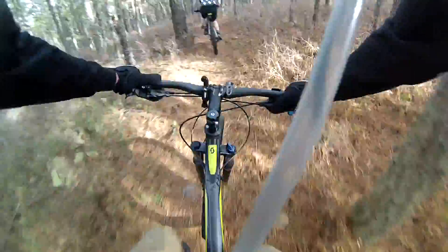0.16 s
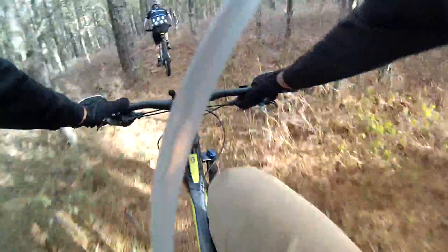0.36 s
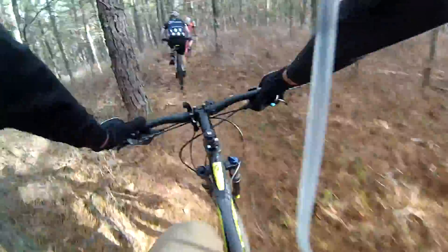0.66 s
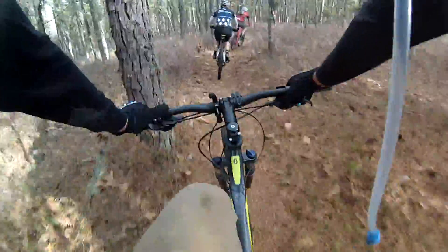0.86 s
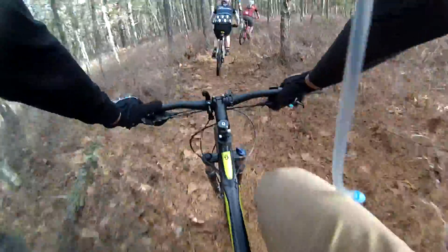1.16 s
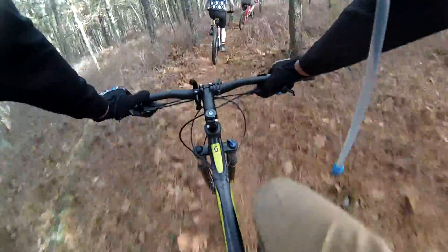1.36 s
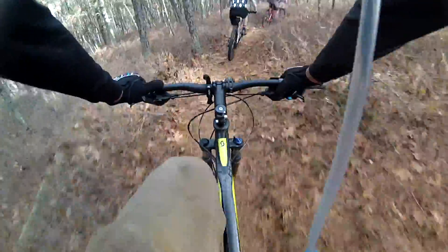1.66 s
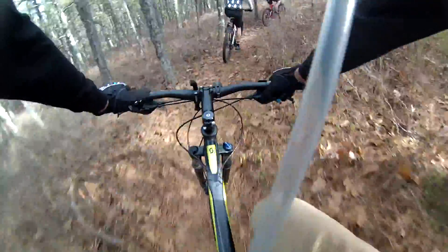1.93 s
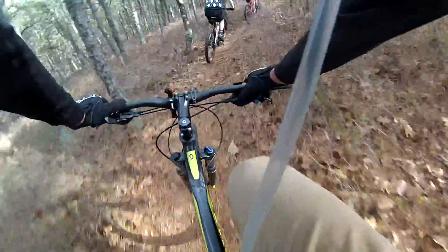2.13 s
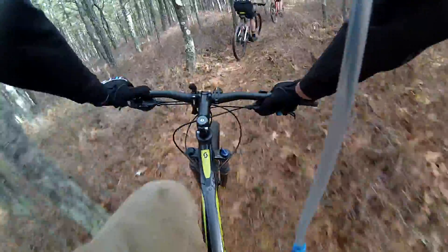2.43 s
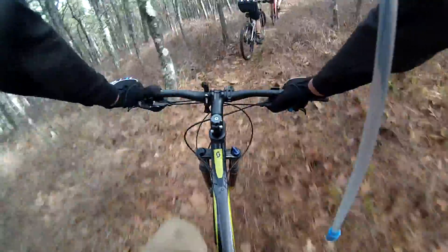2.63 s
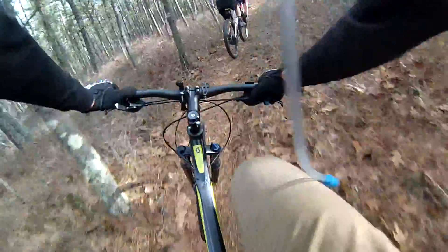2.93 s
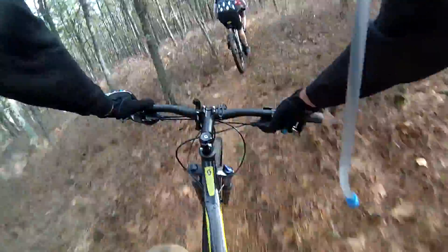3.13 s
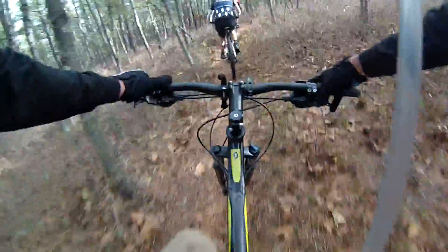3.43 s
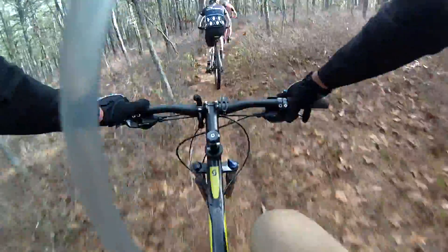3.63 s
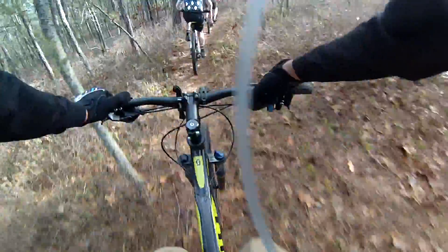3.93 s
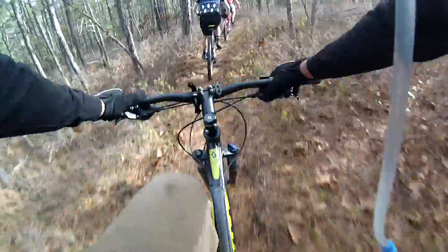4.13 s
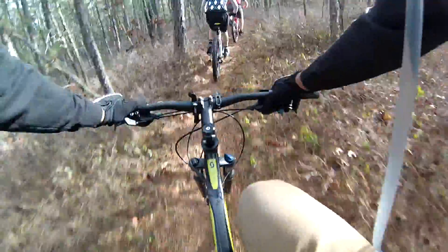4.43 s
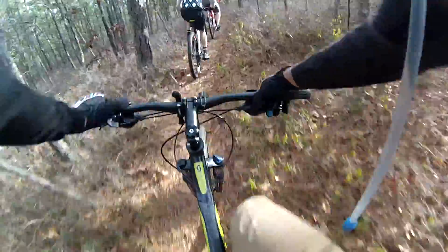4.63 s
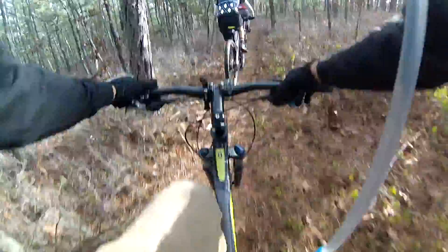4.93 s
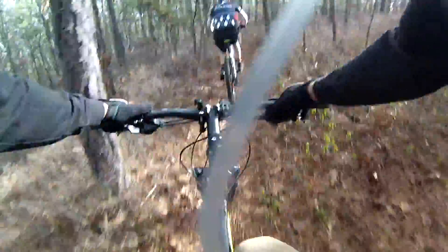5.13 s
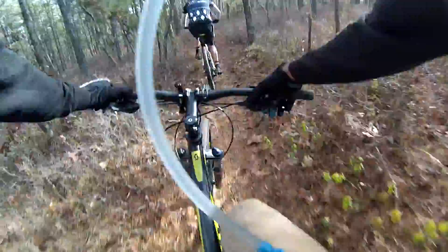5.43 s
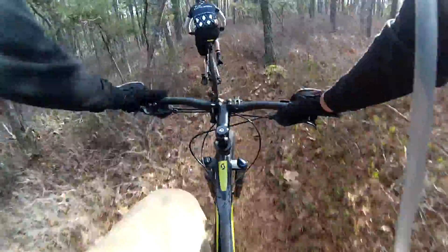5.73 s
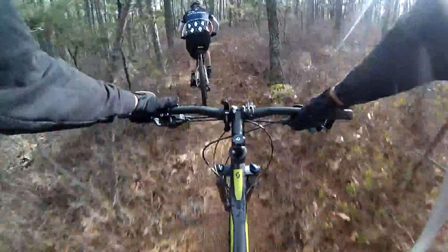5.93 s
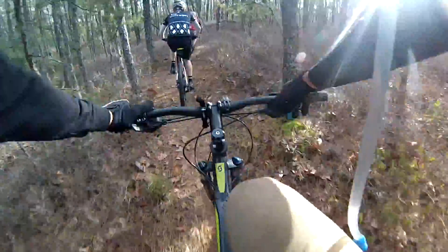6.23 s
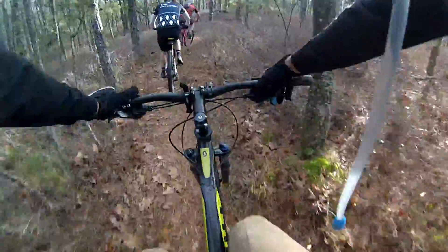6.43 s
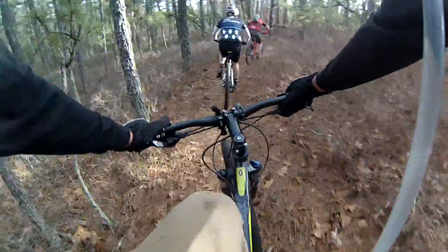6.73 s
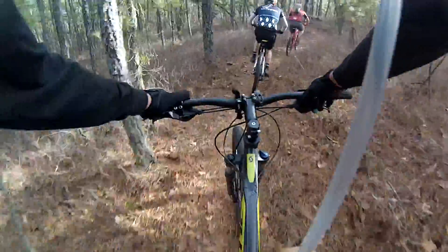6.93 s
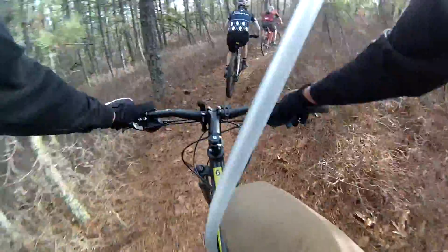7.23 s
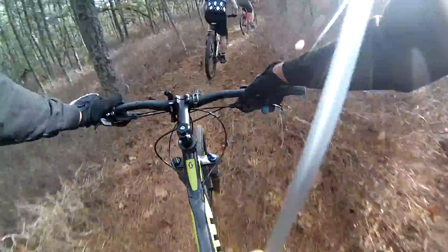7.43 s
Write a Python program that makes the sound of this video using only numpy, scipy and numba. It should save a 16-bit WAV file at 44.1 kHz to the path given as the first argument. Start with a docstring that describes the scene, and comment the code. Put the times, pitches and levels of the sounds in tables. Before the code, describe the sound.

Inside a closed case on a rider's chest, deep bumping thumps, hollow clacks, strap rattles and muffled dry-leaf rustle on a forest trail.

```python
"""Bike ride over a leafy trail, heard inside a case

A microphone sits in a closed case on a rider's chest, on a leafy, rooty trail.
Jolts squeeze the case and pump the microphone: smooth pressure pulses make deep thumps, filtered clicks a low shudder.
Straps and buckles knock, rattle and creak: short noise bursts, pings and clicks ring the resonances of the case.
Dry leaves crackle as random clicks muffled by the case. Short noise bursts make bright ticks; a steady hiss lies below."""
import sys
import numpy as np
from scipy import signal
from scipy.fft import rfft, irfft
from scipy.io import wavfile
from scipy.ndimage import uniform_filter1d
from numba import njit

SR = 44100
rng = np.random.default_rng(int(sys.argv[2]) if len(sys.argv) > 2 else 0)


def generate_wav(sig):
    """Save sig (samples, or channels by samples) to the path in sys.argv[1] as 16-bit PCM at SR."""
    pcm = np.round(np.clip(np.atleast_2d(sig).T, -1, 1) * 32767).astype(np.int16)
    wavfile.write(sys.argv[1], SR, pcm)


N = 333837  # length of the scene [samples]

# Jolts that squeeze the case: (time of deepest suction [s], depth [dB], length at half depth [ms])
JOLT_PULSES = [(0.0, -24, 24), (0.594, -20, 13), (0.864, -26, 15.4), (0.916, -33, 14.6), (1.035, -32, 31),
               (1.174, -33, 21), (1.446, -34, 17.5), (1.769, -30, 13.8), (1.979, -36, 12), (2.351, -32, 16),
               (2.706, -31.5, 21), (3.328, -40, 4.4), (3.357, -13.5, 12.1), (3.527, -31, 17),
               (3.638, -33, 19.6), (3.776, -33.5, 20.4), (3.947, -31.5, 22.5), (4.037, -33.5, 16.6),
               (4.215, -31.5, 5.4), (4.329, -20, 15.5), (4.412, -30.5, 13.8), (4.616, -33.5, 4.64),
               (4.811, -38.5, 16), (5.005, -29, 15), (5.051, -23.5, 12.4), (5.182, -23.5, 17.5),
               (5.361, -12, 15.5), (5.537, -29, 13.4), (5.631, -30.5, 21), (5.917, -24.5, 20.6),
               (6.052, -34.5, 5.9), (6.141, -32, 19.5), (6.565, -39, 12), (6.807, -32.5, 27),
               (6.938, -35, 13.4), (7.258, -35, 15.6), (7.285, -33, 13.4)]
# Knocks on the shell: (time [s], reference level [dB], favoured pitch [Hz], body thud against that level [dB])
SHELL_KNOCKS = [(0.5723, -37, 2125, -13), (0.847, -46, 2300, -10), (0.9043, -48.5, 2160, -11),
                (1.4928, -50.5, 2050, -8), (1.7255, -53, 2150, -25), (1.8758, -51, 2400, -19),
                (1.9011, -46.5, 2370, -32), (2.6687, -50.5, 2300, -11), (3.0646, -59, 2160, 0.5),
                (3.1712, -63.5, 2200, 0.5), (3.3404, -35, 2180, -10), (3.6125, -45, 2170, -21.5),
                (3.8561, -52.5, 2080, -8), (3.9253, -42, 1520, -22), (4.0123, -53, 2280, -21),
                (4.2625, -54, 2160, -5), (4.3103, -58.5, 2260, 6.5), (4.3822, -43, 2140, -26),
                (4.4831, -47.5, 2140, -12.5), (4.567, -57, 1180, -1.5), (4.7712, -43, 2090, -26),
                (4.9684, -47.5, 1180, -10.5), (4.9873, -39, 2010, -26.5), (5.0334, -34.5, 2270, -14.5),
                (5.0478, -51.5, 1400, -3), (5.1133, -34, 2007, -26), (5.167, -63.5, 1140, 9.5),
                (5.2876, -48, 2030, -17), (5.3538, -24.5, 2170, -15), (5.581, -52.5, 2200, -5.5),
                (5.5997, -57, 2180, -12), (5.7788, -48, 1960, -21), (5.8972, -40.5, 2010, -12.5),
                (6.04, -59.5, 2110, 0), (6.275, -58.5, 1200, -11), (6.4012, -43.5, 2100, -32),
                (6.548, -55.5, 1150, -12), (6.6262, -51, 1980, -30), (6.798, -47.5, 2200, -16),
                (6.819, -54, 1120, -15), (7.04, -55.5, 2000, -28), (7.091, -43.5, 2110, -41),
                (7.1367, -51, 1460, -31), (7.218, -65, 1250, -19), (7.322, -45.5, 1110, -24),
                (7.4361, -46, 2010, -34)]
# Bright ticks, the sharp edge of some knocks and small snaps close by: (time [s], level before the filter [dB])
BRIGHT_TICKS = [(0.225, -65), (0.2966, -68.5), (2.0976, -67.5), (2.7377, -70.5), (3.5074, -65), (3.55, -68),
                (3.6116, -52.5), (3.7472, -66), (3.756, -62), (3.924, -66), (4.3105, -69), (4.348, -65.5),
                (4.483, -68), (5.1153, -65), (5.133, -72), (5.235, -72), (5.3537, -74), (5.3614, -73),
                (5.487, -77), (5.974, -68), (6.9835, -68.5)]
# Course of the ride, crunches not included:
# (time [s], leaf rustle [dB], crisp edge against the rustle [dB], shaking [dB])
TRAIL = [(0.0, -69.5, -21, -46), (0.3, -74.5, -25, -51.5), (0.76, -71, -19.5, -47.5),
         (1.3, -71, -12.5, -46.5), (1.75, -74.5, -16.5, -50.5), (2.2, -76, -16, -50.5),
         (3.0, -72, -16, -50), (3.3, -68, -20.5, -43), (4.1, -71.5, -15.5, -46.5), (4.35, -68, -24, -43.5),
         (4.7, -71.5, -20, -46.5), (5.2, -68.5, -17.5, -44.5), (5.5, -68.5, -15, -43.5),
         (5.8, -70, -16.5, -46.5), (6.8, -76.5, -15.5, -50), (7.57, -74, -23, -51)]
# Resonances of the hard shell: (frequency [Hz], width of one filter pass [Hz], level [dB])
SHELL_MODES = [(1130, 318, -3.5), (1481, 260, -4), (2106, 530, 0), (2365, 410, -1.5), (2720, 277, -11.5),
               (3250, 370, -11.5), (3830, 340, -15.5), (4700, 810, -21)]
# Low resonances of the case body: (frequency [Hz], width of one filter pass [Hz], level [dB])
BODY_MODES = [(106.3, 66.8, 6), (206.5, 120.6, -3.5), (394.7, 146, -11), (703, 830, -23)]
# Colour of the air and microphone hiss: (frequency [Hz], relative level [dB])
HISS_COLOUR = [(300, -5.5), (800, 1), (3000, -5), (5000, -7), (8000, -10.5), (12500, -12)]
# Crunches through thicker leaves: (start [s], length [s], rise of the rustle [dB])
LEAF_CRUNCHES = [(0.5, 0.03, 5.5), (0.968, 0.039, 12.5), (1.069, 0.028, 5), (1.618, .05, 7),
                 (1.724, 0.071, 7.5), (1.871, 0.05, 11.5), (1.937, 0.041, 7), (2.657, 0.051, 6),
                 (2.949, 0.049, 6.5), (3.043, 0.048, 4), (3.182, 0.02, 4), (3.238, 0.05, 3.5),
                 (3.314, 0.047, 11), (3.701, 0.021, 10.5), (3.844, 0.029, 9.5), (4.105, 0.071, 6),
                 (4.383, 0.048, 5), (4.992, 0.027, 11.5), (5.039, 0.039, 12), (5.29, 0.067, 10.5),
                 (5.336, .05, 10.5), (5.508, 0.046, 6.5), (5.612, 0.086, 4), (5.896, 0.028, 9.5),
                 (6.002, 0.021, 7), (6.093, 0.031, 5.5), (6.215, 0.02, 7), (6.336, .015, 12),
                 (6.52, .073, 8.5), (6.61, 0.024, 9.5), (6.775, 0.064, 8.5), (7.32, 0.018, 9.5)]

PUSH_SHARE = 0.56  # push before the suction, as a share of its depth
SNAP_DB, THUD_DB, CHATTER_DB = -38, 33, 16  # gains of the three filtered parts of a knock
PING_DB, PING_RISE_S, PING_FALL_S = -5, 0.00069, 0.0031
CHATTER_PER_BODY, PING_PER_BODY = 0.39, -0.19  # dB per dB of body: more chatter, less ping
EVEN_PER_DB = 0.0344  # harder knocks drive the weak upper modes more evenly
CREAK_DB, CREAK_SLOPE = -63.5, 1.42  # strap creak at -47.5 dB of shaking; dB per dB of shaking
CRISP_LAG, TUG_SHARE = 0.66, 0.93  # dB per dB of crunch: the crisp edge falls behind, the straps follow
RATTLE_PER_S, RATTLE_DB = 20, -9.5  # average taps per second; level against the rustle
HISS_DB = -81
TOP_HZ = 12800  # upper limit of the recorder


def jolts():
    """A short push on the case, a deep suction as it springs back, then a slow rebound."""
    t, out = np.arange(N) / SR, np.zeros(N)
    for centre_s, depth_db, length_ms in JOLT_PULSES:
        length_s = length_ms / 1000
        first = max(int((centre_s - 4 * length_s) * SR), 0)
        near = slice(first, int((centre_s + 6 * length_s) * SR))
        u = (t[near] - centre_s) / length_s  # time counted in pulse lengths
        push = PUSH_SHARE * np.exp(-15 * (u + .95) ** 2)
        suction = np.exp(-1.96 * (u ** 2 + .004) ** .75)
        rebound = .42 * np.exp(-1.5 * (u - 1.25) ** 2)
        out[near] += undb(depth_db) * (push - suction + rebound)
    return out


def knocks(focus_db=1.0):
    """The struck spot pings at its own pitch; brief chatter rings the shell modes near it; the body thuds.

    focus_db is the loss of chatter per octave away from the struck pitch."""
    times, db, pitch, body_db = np.transpose(SHELL_KNOCKS)
    noise = rng.standard_normal((3, N))
    snap = undb(SNAP_DB) * mode(bursts(times, db, 4.4) * noise[1], 4900.0, 3500.)
    # The added 0.2 gives every thud a push in the same direction
    blows = bursts(times, db + body_db, 8.6) * (noise[2] + 0.2)
    out = snap + undb(THUD_DB) * ring(blows, BODY_MODES)

    t = np.arange(SR // 25) / SR
    ping = (1 - np.exp(-t / PING_RISE_S)) ** 2 * np.exp(-t / PING_FALL_S)
    for at, level_db, hz in zip(times, db + PING_PER_BODY * body_db, pitch):
        i = int(at * SR)
        out[i:i + len(t)] += undb(level_db + PING_DB) * ping * np.sin(2 * np.pi * hz * t)

    for hz, width, mode_db in SHELL_MODES:
        mode_share_db = (1.43 - EVEN_PER_DB * (db + 42.5)) * mode_db
        distance_loss_db = focus_db * np.abs(np.log2(hz / pitch))
        share_db = CHATTER_PER_BODY * body_db + mode_share_db - distance_loss_db
        chatter = mode(bursts(times, db + share_db, 3.1) * noise[0], hz, width)
        out += undb(CHATTER_DB) * chatter
    return out


def shaking(shudder_db, creak_db):
    """Small bumps keep the case pumping; straps rub on its body."""
    bumps = uniform_filter1d(grains(45, 4.07), size=500)
    shudder = mode(bumps, 19.9, 24.)
    rubbing = grains(500, 2.5) * undb(2.5 * walk(30))
    creak = ring(rubbing, BODY_MODES)
    return undb(shudder_db) * unit(shudder) + undb(creak_db) * unit(creak)


def leaves(db, crisp_db):
    """Dense uneven crackle coloured by the shell, with a thin crisp edge."""
    patches = undb(1.5 * walk(50) + 2.5 * walk(120))
    dull = ring(grains(4000, 2.47) * patches, SHELL_MODES)
    crisp_clicks = grains(12000, 3.5) * patches * undb(2 * walk(26))
    crisp = mode(crisp_clicks, 5600.0, 6800.0)
    return undb(db) * (unit(dull) + undb(crisp_db) * unit(crisp))


def crunches():
    """Thicker leaves briefly raise the rustle: the rise in dB, with soft edges."""
    rise = np.zeros(N)
    for start, length, rise_db in LEAF_CRUNCHES:
        rise[int(start * SR):int((start + length) * SR)] = rise_db
    return uniform_filter1d(rise, size=400)


def ticks():
    """Brief bursts of noise, high-passed so they sound bright, without the colour of the shell."""
    times, db = np.transpose(BRIGHT_TICKS)
    noise_bursts = bursts(times, db, 2.7) * rng.standard_normal(N)
    _, bright = svf(noise_bursts, 5200.0, 2700.0)
    return bright


def rattles(db):
    """Sparse small taps of loose straps, a few ms each, ring the shell modes."""
    fade = np.exp(-1 / (0.0021 * SR))  # falls away over about 2 ms
    taps = signal.lfilter([1], [1, -fade], np.abs(grains(RATTLE_PER_S, 4.0)))
    return undb(db + RATTLE_DB) * unit(ring(taps * rng.standard_normal(N), SHELL_MODES))


def hiss():
    """Air and microphone noise: random sound shaped by a smooth frequency curve."""
    hz = np.arange(N // 2 + 1) * SR / N + 1  # the added 1 avoids the logarithm of zero
    f, db = np.transpose(HISS_COLOUR)
    shape = undb(np.interp(np.log(hz), np.log(f), db)) * (hz > 200)
    return undb(HISS_DB) * unit(irfft(rfft(rng.standard_normal(N)) * shape, N))


def undb(db):
    """Turn decibels into a plain multiplier."""
    return 10 ** (np.asarray(db) / 20)


def unit(x):
    """Scale to an rms (average strength) of 1."""
    return x / np.sqrt(np.mean(x ** 2))


@njit
def svf(x, hz, width):
    """State-variable filter: band-pass with gain 1 at the centre, and high-pass."""
    band, high = np.empty(len(x)), np.empty(len(x))
    b, l = 0., 0.  # the filter's two memories
    g, k = np.tan(np.pi * hz / SR), width / hz
    for i in range(len(x)):
        v = (b + g * (x[i] + 1e-18 - l)) / (1 + g * (g + k))
        low = l + g * v
        band[i] = k * v
        high[i] = x[i] - k * v - low
        b, l = 2 * v - b, 2 * low - l
    return band, high


def mode(x, hz, width):
    """One resonance, filtered twice so that less sound passes on either side of it."""
    hz, width = 1. * hz, 1. * width
    once, _ = svf(x, hz, width)
    twice, _ = svf(once, hz, width)
    return twice


def ring(x, modes):
    """Sum of resonances, neighbours in opposite sign."""
    out = np.zeros(len(x))
    for k, (hz, width, db) in enumerate(modes):
        out += (-1) ** k * undb(db) * mode(x, hz, width)
    return out


def walk(rate):
    """Random levels, each held for 1 / rate seconds, then smoothed twice; spread near 1."""
    k = int(SR / rate)
    steps = np.repeat(rng.standard_normal(N // k + 1), k)
    return 1.3 * uniform_filter1d(uniform_filter1d(steps, k), k)[:N]


def grains(per_s, spread_db):
    """Random clicks, most small and a few large, scaled to rms 1."""
    chance = rng.random((3, N))
    happens = chance[0] < per_s / SR
    sign = np.sign(chance[1] - .5)
    size = undb(-spread_db * np.log(1.002 - chance[2]))
    return unit(happens * sign * size)


def bursts(times, dbs, decay_ms):
    """Envelope: a sudden rise and an exponential fall at each time."""
    env = np.zeros(N + SR)
    tail = np.exp(-np.arange(SR // 20) / (decay_ms * SR / 1000))
    for s, db in zip(times, dbs):
        i = int(s * SR)
        env[i:i + len(tail)] += undb(db) * tail
    return env[:N]


def curve(table):
    """Columns of a table, drawn as straight lines between its times, sample by sample."""
    times, *columns = np.transpose(table)
    return [np.interp(np.arange(N) / SR, times, column) for column in columns]


def scene():
    """All sources at the one microphone; rough ground crunches the leaves and tugs the straps together."""
    rustle_db, crisp_db, shake_db = curve(TRAIL)
    rise_db = crunches()
    creak_db = CREAK_DB + CREAK_SLOPE * (shake_db + 47.5) + TUG_SHARE * rise_db
    case = jolts() + knocks() + shaking(shake_db, creak_db) + rattles(rustle_db)
    rustle = leaves(rustle_db + rise_db, crisp_db - CRISP_LAG * rise_db)
    return (case + rustle + ticks() + hiss())[None]


def record(dry):
    """The recorder cuts the top with a steep low-pass filter."""
    low_pass = signal.ellip(8, .2, 40, TOP_HZ, fs=SR, output="sos")
    return signal.sosfilt(low_pass, dry)


dry = scene()
out = record(dry)
generate_wav(out)
```